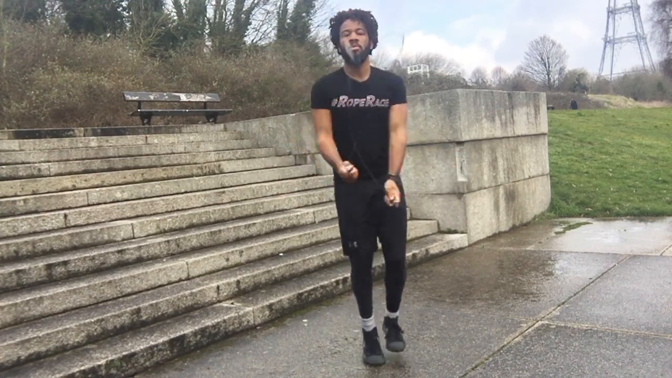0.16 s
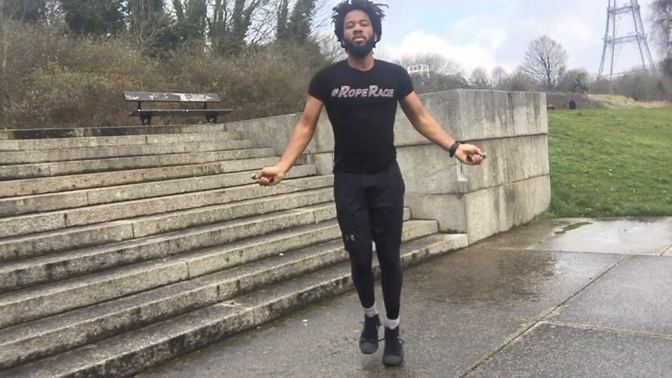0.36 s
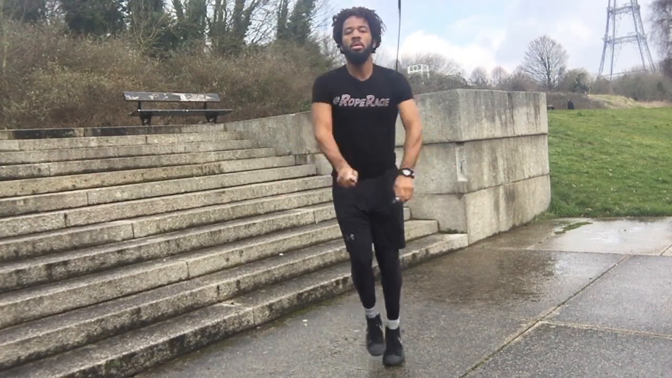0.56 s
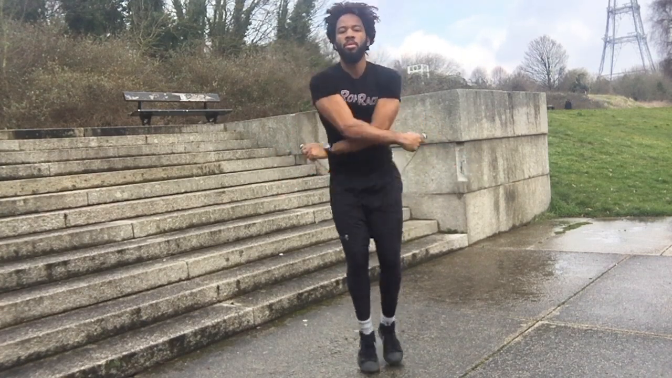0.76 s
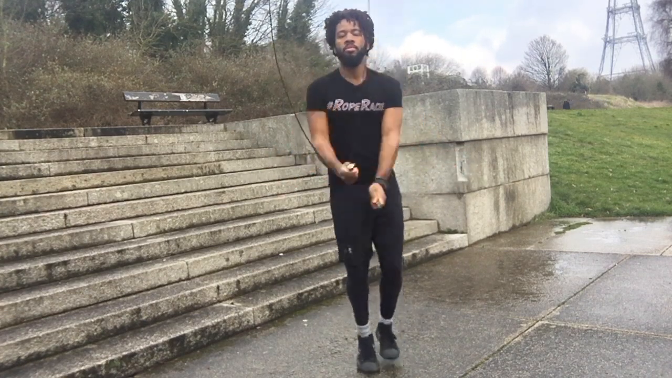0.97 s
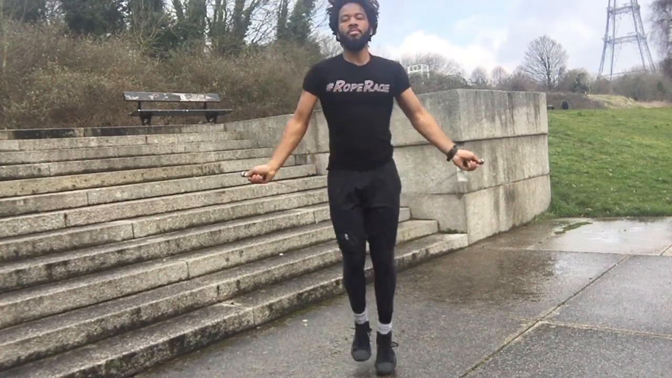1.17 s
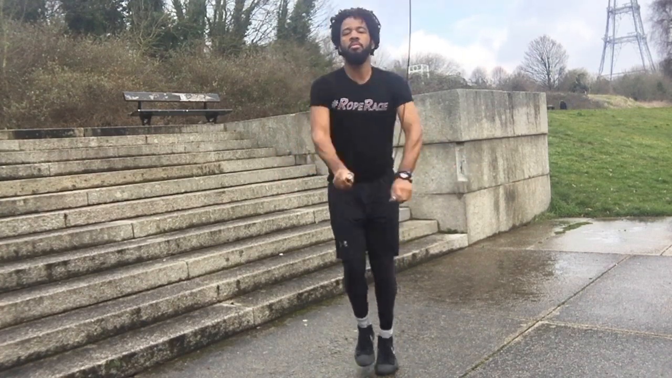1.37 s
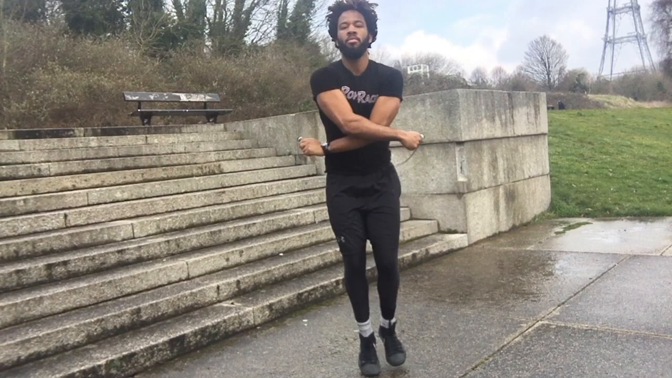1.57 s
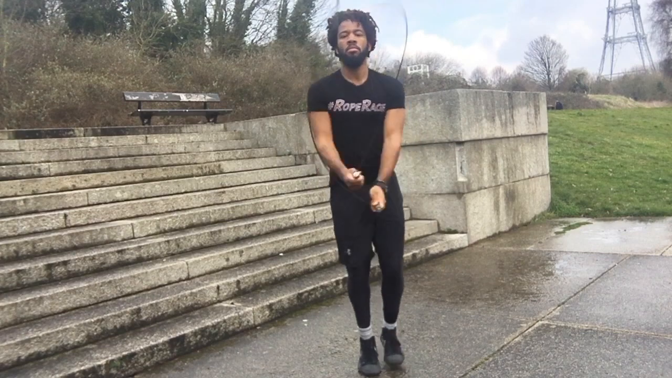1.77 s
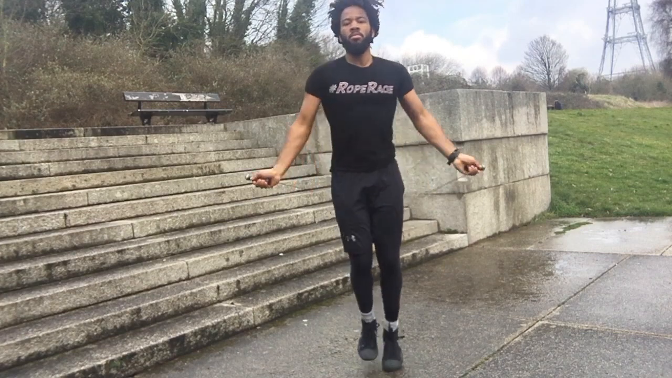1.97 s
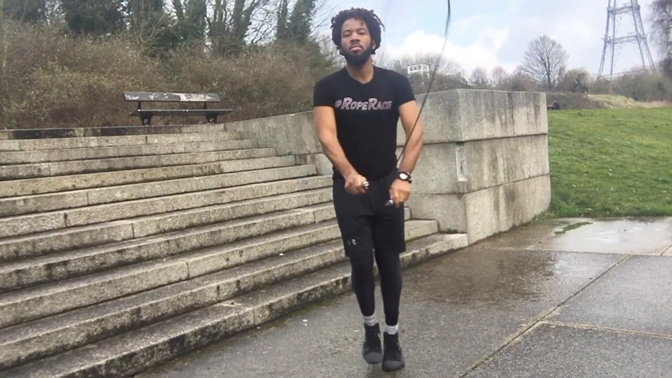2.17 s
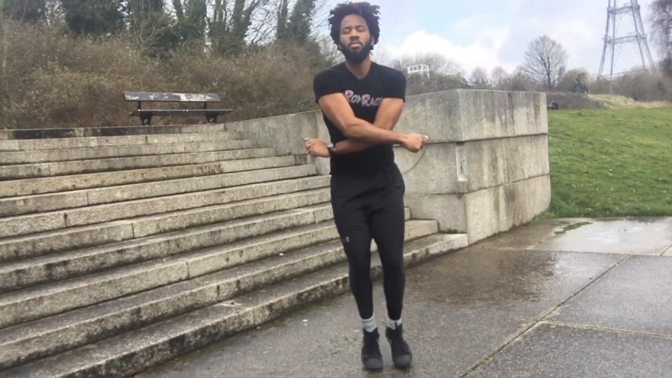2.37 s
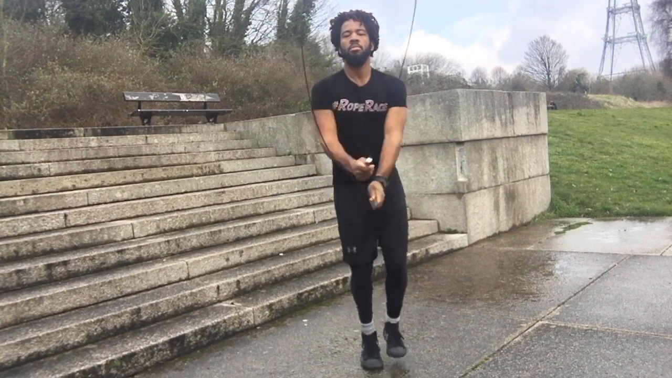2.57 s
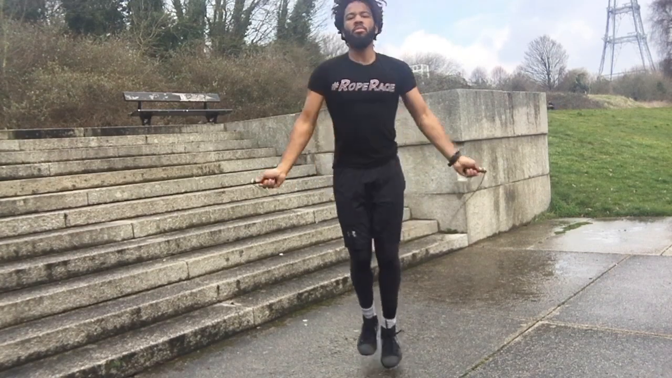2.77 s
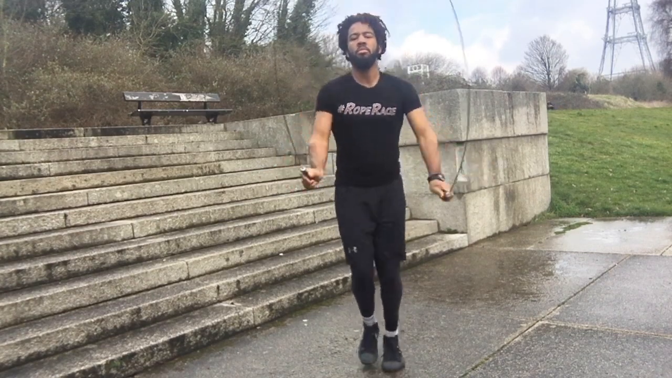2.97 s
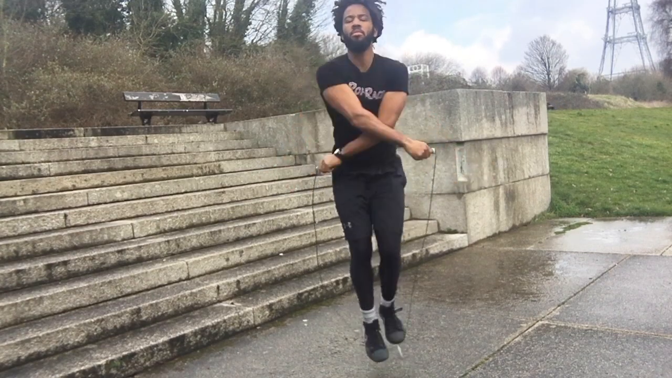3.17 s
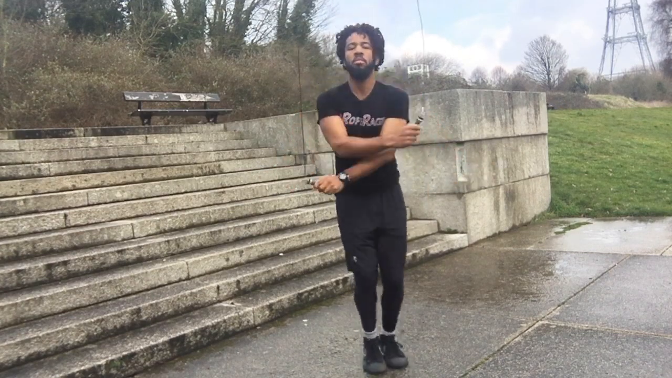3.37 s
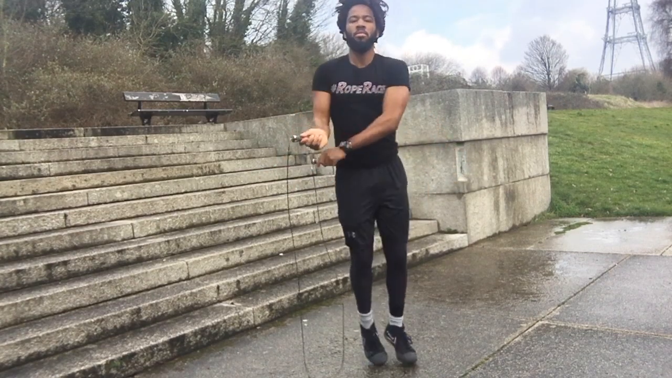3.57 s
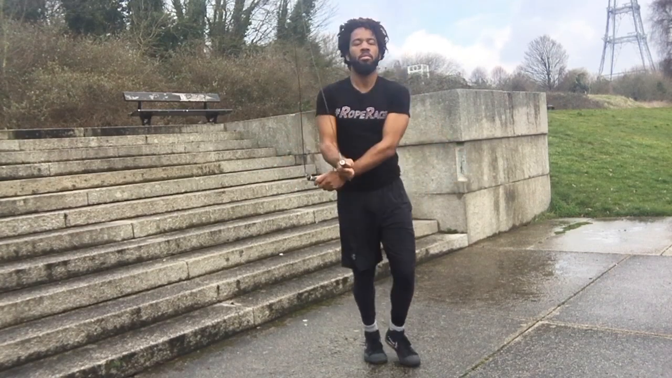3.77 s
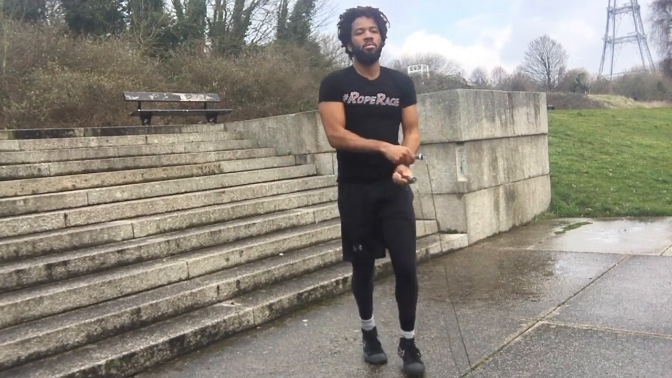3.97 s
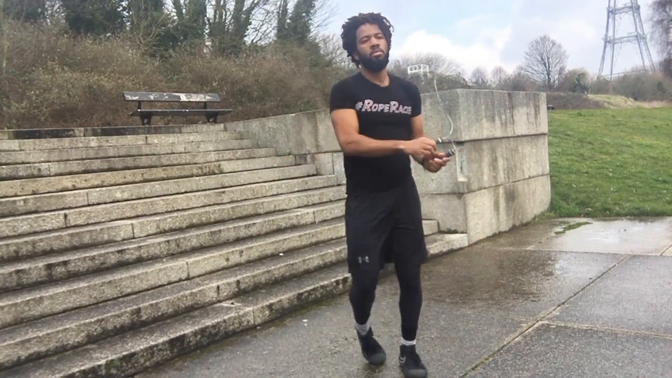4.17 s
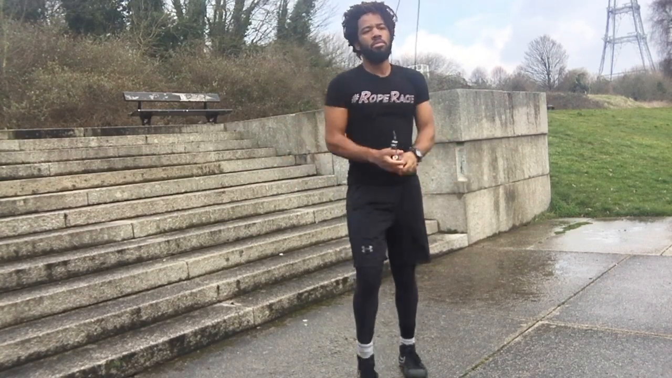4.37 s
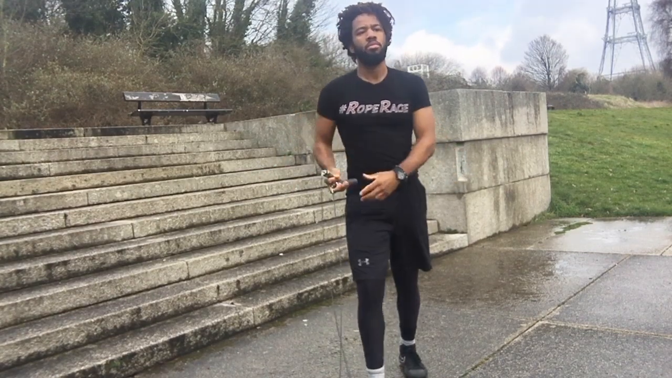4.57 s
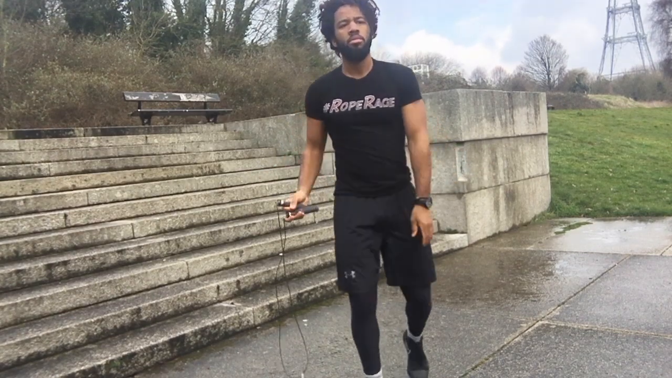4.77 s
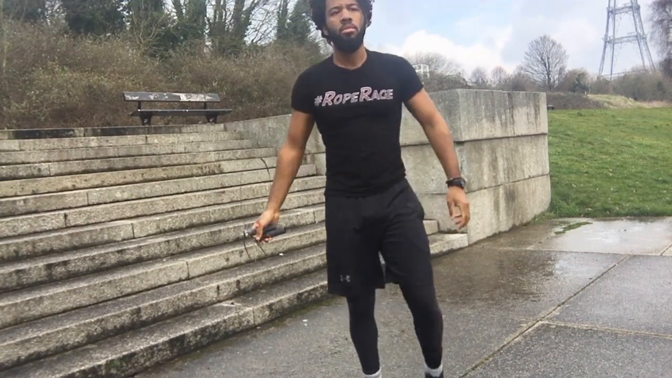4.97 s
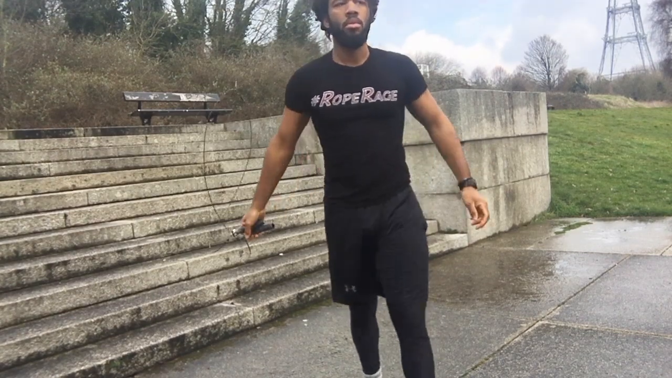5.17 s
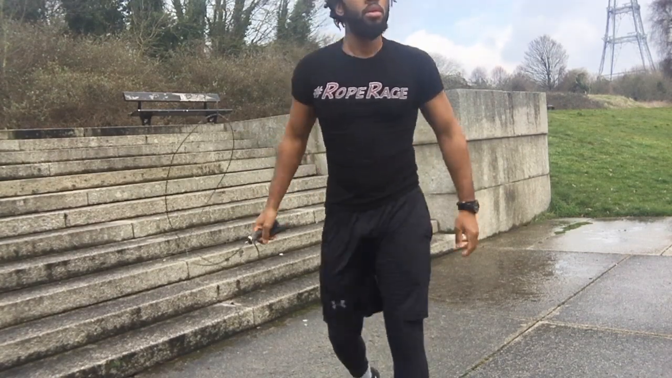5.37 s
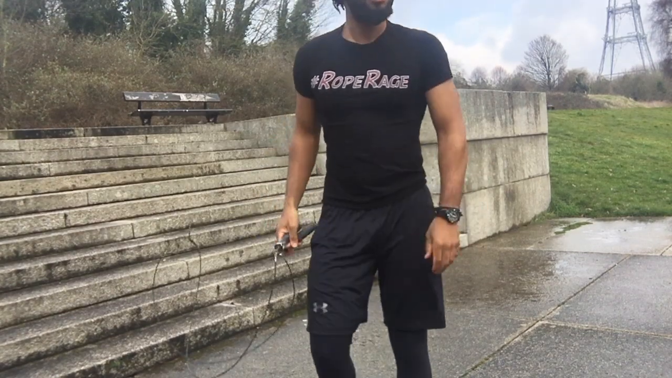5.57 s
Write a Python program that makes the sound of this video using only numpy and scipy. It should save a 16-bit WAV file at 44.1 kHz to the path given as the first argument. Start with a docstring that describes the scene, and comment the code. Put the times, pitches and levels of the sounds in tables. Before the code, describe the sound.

From the start, someone skips with a thin rope on wet paving outdoors. The cord whistles and swishes in rising and falling surges and cracks on the ground about every 0.4 seconds. Shoes land between the cracks with hollow pats, joined by tiny splashes, fine spray and crunching grit. Nearby stone steps add a slight, short echo. A bird calls faintly at about 2 seconds. After 3 seconds the slaps weaken, and near 4 seconds the skipping winds down into a few loose flicks and scrapes. The hollow plastic handles clack together at about 4.1 seconds, then more lightly at 4.6, 4.8 and 5.3. The bird calls again around 4.2 seconds, and a very faint, far hiss slides in pitch until the end at about 5.6 seconds. A low rumble of wind or distant traffic and a far engine hum continue throughout.

```python
"""Wind or far traffic rumbles as someone skips with a thin speed rope on wet paving, by stone park steps.
The cord whistles through the air on every turn, shoes land with hollow pats, and the cord cracks on the
ground, throwing up spray. About two seconds in, a bird calls faintly. Near four seconds the skipping winds
down into loose flicks and the handles knock together, while the bird calls again and a far hiss glides."""
import sys
import numpy as np
from scipy import signal
from scipy.fft import rfft, irfft, next_fast_len
from scipy.io import wavfile
from scipy.ndimage import uniform_filter1d

SR = 44100
rng = np.random.default_rng(int(sys.argv[2]) if len(sys.argv) > 2 else 0)


def file_out(sig):
    """Save sig as 16-bit WAV at sys.argv[1]."""
    # one column per channel
    cols = np.atleast_2d(sig).T
    # limit, then scale
    lim = np.clip(cols, -1, 1)
    pcm = np.round(lim * 32767).astype(np.int16)
    wavfile.write(sys.argv[1], SR, pcm)


N = 247401
TIME = np.arange(N) / SR

# The cord hits the paving. Each row: start in seconds, relative level in dB, contact time in
# milliseconds, brightness in dB, relative spray level in dB.
SLAPS = [(0.3218, -32.5, 5.05, 6, -54), (0.7243, -29.5, 0.87, 6.5, -57.5), (1.13, -30, 3.95, 1.5, -54),
         (1.5244, -27, 1.3, 2, -57), (1.9194, -27.5, 2.44, 5, -57.5), (2.3173, -30.5, 1.6, 2.5, -55),
         (2.742, -28.5, 5.4, 7.5, -54), (3.1823, -34, 2.6, 6.5, -70), (3.626, -41, 3.6, 7, -84),
         (4.0245, -42, 2.05, 17.5, -55.5), (4.671, -40, 1.86, 4, -66), (4.792, -46.5, 1.95, 1.5, -78)]
# How hard the person skips. Each row: time in seconds, level change in dB.
EFFORT = [(0, 4), (0.42, -5), (0.54, -2.5), (0.66, -0.5), (1.15, 1), (1.34, -3), (1.5, 1.5), (2.3, 1),
          (2.9, 0.5), (3.38, -2), (3.55, -1), (3.82, -5.5), (4.1, -6.5), (4.35, -10.5), (4.55, -14),
          (5.6, -22)]
# The tone of drops, swishing air and wet grit. Each row: frequency in Hz, relative strength in dB.
SPRAY_SPECTRUM = [(400, -23.5), (800, -1), (1500, -6), (3000, 3.5), (4500, -1), (6500, -6), (10000, -14),
                  (16000, -13.5)]
SWISH_SPECTRUM = [(120, -1.5), (205, 11), (280, 1), (600, 4), (1300, 0.5), (1800, 2), (2400, -3),
                  (3800, -3), (5500, -11), (8000, -17), (16000, -35.5)]
FIZZ_SPECTRUM = [(2000, -8), (4000, 0), (7000, 3), (9000, -6.5), (12000, -4.5), (16000, -11)]


def from_db(db):
    """Turn decibels into a number to multiply by."""
    return 10 ** (np.asarray(db) / 20)


def rms_one(x):
    """Scale a signal so that its average power is 1."""
    return x / np.sqrt(np.mean(x ** 2) + 1e-20)


def in_time(rows):
    """Join rows of (seconds, values...) with straight lines: one curve for each value."""
    times, *columns = np.transpose(rows)
    return [np.interp(TIME, times, column) for column in columns]


def bells(rows):
    """Add up smooth bumps. Each row: middle in seconds, half length in seconds, height."""
    t = TIME[::SR // 1000]
    middle, half_length, height = np.transpose(rows)[:, :, None]
    return np.interp(TIME, t, (height * np.exp(-((t - middle) / half_length) ** 2)).sum(axis=0))


def add(out, start, sound):
    """Mix a sound in at a start time in seconds."""
    i = int(np.clip(start * SR, 0, N - 1))
    out[i:i + len(sound)] += sound[:N - i]


def lowpass(x, hz):
    """Gently turn down everything above hz."""
    return signal.sosfilt(signal.butter(2, min(hz, SR / 2 - 1), fs=SR, output="sos"), x + 1e-18)


def band(x, hz, width):
    """Keep the sound around hz; width is a share of that frequency."""
    return signal.lfilter(*signal.iirpeak(hz, 1 / width, fs=SR), x)


def colour(x, spectrum):
    """Give a sound the tone of a spectrum table; white noise keeps its power."""
    size = next_fast_len(N + SR // 4, real=True) // 2 * 2
    hz, db = np.transpose(spectrum)
    bin_hz = np.arange(size // 2 + 1) * SR / size
    gain = rms_one(from_db(np.interp(np.log(bin_hz + 1), np.log(hz), db)))
    # make the filter ring only after a click, never before it
    cepstrum = irfft(np.log(gain))
    cepstrum[1:size // 2] *= 2
    cepstrum[size // 2 + 1:] = 0
    return irfft(rfft(x, size) * np.exp(rfft(cepstrum)))[:N]


def drift(rate_hz):
    """A smooth random wander, about 1 in size."""
    return rms_one(lowpass(rng.standard_normal(N + SR), rate_hz)[SR:])


def grains(per_s, spread_db):
    """Random clicks of uneven size."""
    sizes = from_db(spread_db * np.minimum(rng.exponential(1, N), 4)) * rng.choice([-1, 1], N)
    return rms_one(sizes * (rng.random(N) < per_s / SR))


def swings():
    """The cord's pitch and level climb with each swing and sink as it coasts; the fastest swing leads."""
    # The whistle surges about three times a jump. Each row: time of top speed in seconds, top pitch
    # in Hz, relative level in dB, length in seconds, delay of the loudest moment in seconds.
    surges = [(0.0, 1060, -47.5, 0.039, 0), (0.17, 1055, -55, .06, 0.0054), (0.28, 1270, -40, 0.024, 0.01),
              (0.449, 1120, -51, .04, 0), (0.6, 980, -52.5, 0.047, 0), (0.692, 1220, -52, 0.039, 0.01),
              (0.823, 1190, -46.5, 0.052, 0.004), (0.92, 890, -49.5, 0.032, 0.025),
              (1.004, 1060, -53, .075, 0), (1.1, 1180, -44, 0.049, 0.0085),
              (1.262, 1232, -48.5, .024, 0.0044), (1.313, 924, -47, 0.025, .014),
              (1.44, 1190, -52, .07, 0.036), (1.565, 1000, -47, 0.029, 0.0031), (1.618, 1210, -42, .036, 0),
              (1.72, 930, -54, .07, 0), (1.891, 1420, -38.5, 0.024, 0.021),
              (2.073, 1160, -44, 0.032, 0.033), (2.26, 1100, -48, .06, 0.00044),
              (2.421, 1060, -47, 0.058, 0.00042), (2.531, 800, -53.5, .03, .01),
              (2.579, 1150, -49, 0.018, 0), (2.705, 1340, -38.5, .014, 0.0088),
              (2.87, 951, -59, 0.098, 0.0024), (3.086, 1210, -46, .021, 0.0038),
              (3.195, 1031, -54, .025, 0), (3.285, 1150, -42.5, 0.029, 0.004),
              (3.448, 970, -52.5, .07, 0.05), (3.573, 1150, -47, 0.041, .015), (3.77, 937, -58.5, .06, .02),
              (4.05, 1000, -64, 0.048, 0)]
    pitch_sag, fade_db = 0.165, 7.5   # how fast pitch and level drop away from the top
    wind_up, rounding = 1.3, 0.3   # speed rises faster than it falls, over a blunt top
    slack_hz = 600   # the coasting cord sinks no lower
    top_time, top_hz, top_db, length, delay = np.transpose(surges)[:, :, None]
    t = TIME[::SR // 500]

    def away(moment):
        offset = (t - moment) / length
        return np.hypot(np.where(offset < 0, wind_up * offset, offset), rounding) - rounding

    hz = np.maximum((top_hz * np.exp(-pitch_sag * away(top_time))).max(axis=0), slack_hz)
    level_db = (top_db - fade_db * away(top_time + delay)).max(axis=0)
    hz, level_db = in_time(np.column_stack([t, hz, level_db]))
    shiver = 1 + 0.012 * drift(15.9)   # the loop shivers as it turns
    return hz * shiver, level_db


def whistle():
    """Swirls of air peel off the cord: almost a pure tone when it is slow, a rough rush when whipped."""
    hz, level_db = swings()
    speed = hz / 1000
    rotation = np.exp(2j * np.pi * np.cumsum(hz) / SR)

    def swirls(width_hz):
        return rms_one(np.real(rotation * (drift(width_hz) + 1j * drift(width_hz))))

    # the tone stands out while the cord sweeps past, which is when its pitch falls
    passing = np.tanh(-uniform_filter1d(np.gradient(hz), size=SR // 60) * SR / 2500)
    jitter = 0.5 * speed ** 2 * drift(50)
    tone = rms_one(np.real(rotation * np.exp(1j * jitter)))
    tone *= from_db(2.5 * passing + 3 * drift(50))
    rush = 0.5 * speed ** 2 * swirls(86) + 0.18 * speed ** 3 * swirls(503)
    return from_db(level_db) * (0.5 * tone + rush)


def jumps():
    """How many dB the swish and the fizz rise during the three parts of every jump."""
    # Each part: seconds after the slap, half length in seconds, swish rise in dB, fizz rise in dB.
    downstroke = (-0.46, 0.0716, 8.5, 9)
    follow_through = (0.084, 0.051, 3.6, 4.5)
    landing = (0.169, 0.034, 2.6, 6.1)
    swish, fizz = 0, 0
    for after, half_length, swish_db, fizz_db in (downstroke, follow_through, landing):
        swell = bells([(slap[0] + after, half_length, 1) for slap in SLAPS])
        swish += swish_db * swell
        fizz += fizz_db * swell
    return swish, fizz


def swish_and_fizz():
    """Cord and clothes swish through the air, and the wet paving gives a fine fizz."""
    effort_db, = in_time(EFFORT)
    swish_rise_db, fizz_rise_db = jumps()
    swish_db = -61.5 + effort_db + swish_rise_db + 1.1 * drift(25)
    fizz_db = -73.5 + effort_db + fizz_rise_db + 2.8 * drift(45)
    swish = colour(rng.standard_normal(N), SWISH_SPECTRUM)
    fizz = colour(grains(per_s=8100, spread_db=5.5), FIZZ_SPECTRUM)
    return from_db(swish_db) * swish + from_db(fizz_db) * fizz


def rumble_and_hush():
    """A low rumble of wind or far traffic, with brief buffets and dips, under a steady hush."""
    # The tone of each. Each row: frequency in Hz, relative strength in dB.
    rumble_spectrum = [(20, -31), (32, -19.5), (42, -10), (54, 6), (75, 0.5), (100, -4.5), (120, -10.5),
                       (150, -15.5), (220, -19.5), (400, -37.5), (16000, -130)]
    hush_spectrum = [(100, -2.5), (180, -0.5), (300, -7.5), (600, -13.5), (1000, -12.5), (1600, -18.5),
                     (3000, -26.5), (4500, -29), (7500, -39.5), (10000, -45.5), (16000, -50)]
    # Brief rises and dips. Each row: middle in seconds, half length in seconds, change in dB.
    buffets = [(0.53, 0.018, 5), (1.04, 0.062, 2.5), (1.6, 0.089, -2), (2.52, .03, 6.5), (2.62, .03, 0.5),
               (2.78, 0.061, 5), (3.04, 0.039, 8), (3.13, 0.036, -10), (3.5, .045, -8), (4.2, .08, 8),
               (4.46, 0.047, 9.5), (4.61, 0.068, -8), (5.12, 0.12, 5), (5.33, 0.037, 4.5), (5.53, 0.077, 4)]
    rumble_db = -53 + bells(buffets) + 0.7 * drift(7.6)
    rumble = colour(rng.standard_normal(N), rumble_spectrum)
    rumble /= np.sqrt(uniform_filter1d(rumble ** 2, size=SR // 12))   # even out the noise first
    hush = colour(rng.standard_normal(N), hush_spectrum)
    return from_db(rumble_db) * rumble + from_db(-57.5) * hush


def engine():
    """One far engine drones, wavering with distance."""
    # Its hum. Each row: time in seconds, pitch in Hz, level in dB.
    hum = [(0, 110, -58.5), (.4, 112, -53.5), (.8, 117, -51), (1.5, 121, -55.5), (2.3, 120, -60),
           (2.9, 116, -58), (3.6, 113, -58.5), (5.61, 103, -60)]
    hz, level_db = in_time(hum)
    gain = from_db(level_db + 2.0 * drift(9.2))
    return gain * np.sin(2 * np.pi * np.cumsum(hz) / SR + 0.47 * drift(5.3))


def shoes():
    """Air squeezed from under a sole gives a pat that falls in pitch; harder landings smack brighter."""
    # Each row: start of a landing in seconds, relative level in dB, pitch in Hz that the pat falls past.
    landings = [(0.023, -34, 398), (0.408, -39.5, 520), (0.481, -42, 630), (0.822, -39.5, 754),
                (0.85, -36.5, 547), (1.244, -36.5, 375), (1.291, -37.5, 503), (1.627, -40.5, 460),
                (1.659, -38, 415), (2.034, -36, 535), (2.084, -40, 587), (2.361, -30, 554),
                (2.429, -38.5, 565), (2.445, -40.5, 305), (2.856, -36, 546), (2.903, -36, 487),
                (3.281, -38, 318), (3.321, -34, 541.6), (3.672, -41, 358)]
    # The tone of a sole on stone. Each row: frequency in Hz, relative strength in dB.
    scuff_spectrum = [(100, -29.5), (250, 5), (370, 4), (600, -5), (1000, -14.5), (1500, -25), (4000, -32),
                      (16000, -36)]
    out, scuff, t = np.zeros(N), np.zeros(N), np.arange(SR // 12) / SR
    for start, level_db, pat_hz in landings:
        hz = pat_hz * (0.677 + 1.33 * np.exp(-t / 0.0013))
        pat = np.sin(2 * np.pi * np.cumsum(hz) / SR) * (1 - np.exp(-t / 0.0005)) * np.exp(-t / 0.002)
        smack = lowpass(rng.standard_normal(len(t)) * np.exp(-t / 0.0015), 2600)
        gain = from_db(level_db + 8.0)
        add(out, start + 0.001465, gain * (pat + from_db(level_db + 28.0) * smack))
        add(out, start + rng.uniform(0.00548, 0.00979), gain * 0.37 * pat)   # the rest of the sole lands
        add(scuff, start + 0.00206, gain * rng.standard_normal(len(t)) * np.exp(-t / 0.0076))
    return out + from_db(-16) * colour(scuff, scuff_spectrum)


def scrapes():
    """Wet grit crunches under soles and cord in a dense run of tiny clicks."""
    # Each row: middle of a scrape in seconds, half length in seconds, relative level in dB.
    drags = [(0.084, 0.031, -64.5), (0.43, 0.0074, -73), (0.495, 0.007, -65), (0.662, .012, -60.5),
             (0.898, 0.017, -60.5), (1.047, 0.018, -60.5), (1.688, 0.02, -59), (1.992, 0.017, -60.5),
             (2.45, 0.022, -58), (3.095, .012, -59), (3.34, 0.017, -60), (3.469, 0.017, -61.5),
             (3.75, 0.0084, -61.5), (3.947, 0.0082, -63), (4.043, 0.0055, -55), (4.088, 0.044, -59),
             (4.351, .008, -69), (4.449, 0.017, -67), (4.697, 0.0094, -61), (5.317, .014, -63)]
    pressure = bells([(middle, half_length, from_db(db)) for middle, half_length, db in drags])
    grit = colour(grains(per_s=3900, spread_db=3.5), FIZZ_SPECTRUM)
    crunch = grit + 5.4 * band(grains(per_s=2300, spread_db=2.0), 3340, width=0.45)
    rub = colour(rng.standard_normal(N), SWISH_SPECTRUM)
    return pressure * (from_db(-1.5) * crunch + from_db(-1) * rub)


def slaps():
    """The cord lays itself along the stone: a few hard touches in a row, and the film of water bursts."""
    # The tone of the crack. Each row: frequency in Hz, relative strength in dB.
    crack_spectrum = [(150, -16), (500, -9.5), (800, -6.5), (1150, -3.5), (2000, -1), (2850, -2.5),
                      (3400, -2), (4000, -0.5), (5000, -3.5), (7000, -3.5), (10000, -7.5), (13000, -8),
                      (16000, -15)]
    out, t = np.zeros(N), np.arange(SR // 25) / SR
    for start, level_db, contact_ms, bright_db, _ in SLAPS:
        contact_s = contact_ms / 1000
        touches = np.zeros(len(t))
        touches[0] = 1
        later_s = (np.arange(3) + rng.uniform(0.2, 1, size=3)) / 3 * contact_s
        touches[(later_s * SR).astype(int)] += rng.choice([-1, 1], size=3) * rng.uniform(0.79, 1, size=3)
        film = rng.standard_normal(len(t)) * np.exp(-t / (0.0048 + 0.7 * contact_s))
        hit = touches + 0.69 * film * np.linalg.norm(touches) / np.linalg.norm(film)
        treble = signal.sosfilt(signal.butter(2, 4200, "high", fs=SR, output="sos"), hit)
        hit = lowpass(hit, 3000) - from_db(bright_db - 3.0) * treble
        add(out, start, from_db(level_db + 22.5) * hit / np.linalg.norm(lowpass(hit, 10700)))
    return colour(out, crack_spectrum)


def spray():
    """Each slap flings up a fine mist and a few fat drops that click back one by one."""
    amount, t = np.zeros(N), np.arange(SR // 3) / SR
    for start, *_, spray_db in SLAPS:
        add(amount, start, from_db(spray_db + 12.0) * (1 - np.exp(-t / 0.0036)) * np.exp(-t / 0.032))
    mist = grains(per_s=4000, spread_db=1.0)
    drops = grains(per_s=220, spread_db=2.5)
    return colour(amount * (mist + 1.77 * drops) / 2, SPRAY_SPECTRUM)


def splashes():
    """Tiny splashes, each a soft click and a brief crackle; fainter drips fall at random."""
    # The loudest wet ticks of soles and cord. Each row: start in seconds, relative level in dB.
    ticks = [(0.3461, -31), (0.378, -38), (0.427, -37.5), (0.4933, -37), (1.278, -35.5), (1.4635, -39.5),
             (1.8326, -41), (1.8657, -40), (1.9734, -39), (2.0683, -43.5), (2.36, -37), (2.4336, -35),
             (2.4942, -40), (2.754, -39), (2.7635, -37), (2.8, -34), (3.0849, -38.5), (3.4449, -39),
             (4.1644, -43.5)]
    drips_per_s = 11
    out, t = np.zeros(N), np.arange(SR // 30) / SR
    crackle = grains(per_s=3500, spread_db=2.0)
    effort_db, = in_time(EFFORT)
    drip_db = -47.5 + effort_db + 1.5 * rng.standard_normal(N)
    falls = rng.random(N) < drips_per_s / SR
    for k, (start, level_db) in enumerate([*ticks, *zip(TIME[falls], drip_db[falls])]):
        piece = crackle.take(k * len(t) + np.arange(len(t)), mode="wrap")
        splash = 0.42 * piece * np.exp(-t / 0.006)
        splash[0] = 3.0   # the click
        add(out, start + 0.001054, splash * from_db(level_db - 1.5))
    return lowpass(colour(out, SPRAY_SPECTRUM), 10600)


def whooshes():
    """Short, broad whooshes with no clear pitch come during the skipping."""
    # Each row: middle of a whoosh in seconds, half length in seconds, level in dB, centre in Hz.
    rushes = [(0.357, 0.017, -54, 1900), (1.094, 0.015, -45, 1610), (1.448, 0.023, -55, 1510),
              (1.567, 0.023, -51, 1752), (2.003, 0.019, -50, 1612), (2.271, .03, -51, 1540),
              (2.963, .025, -54, 1680), (3.84, 0.025, -62.5, 1614)]
    out = np.zeros(N)
    for middle, half_length, level_db, hz in rushes:
        swell = np.exp(-np.linspace(-2, 2, int(4 * half_length * SR)) ** 2)
        rush = band(band(rng.standard_normal(len(swell)), hz, width=0.41), hz, width=0.83)
        add(out, middle - 2 * half_length, from_db(level_db) * swell * rms_one(rush))
    return out


def bird():
    """A bird's thin whistles glide and settle, blurred by distance."""
    # Each row: start and length of a call in seconds, first and last pitch in Hz, level in dB.
    calls = [(1.985, 0.082, 4020, 4010, -59), (4.189, 0.09, 4050, 3700, -65.5),
             (4.241, 0.12, 3300, 2910, -57.5), (4.432, 0.28, 7500, 7800, -78),
             (5.423, 0.17, 7560, 7200, -78)]
    out = np.zeros(N)
    for start, length, start_hz, end_hz, level_db in calls:
        progress = np.linspace(0, 1, int(length * SR))
        waver, flutter = drift(130)[:len(progress)], drift(60)[:len(progress)]
        hz = end_hz + (start_hz - end_hz) * (1 - progress) ** 4 + 45 * waver
        gain = from_db(level_db + 2.93 * flutter) * np.sin(np.pi * progress)
        add(out, start, gain * np.sin(2 * np.pi * np.cumsum(hz) / SR))
    return out


def handles():
    """Gathered in one hand, the hollow plastic handles clack, chatter and ring very briefly."""
    # Each row: start of a knock in seconds, relative level in dB, ring in Hz, treble cut-off in Hz.
    knocks = [(4.092, -23, 3520, 5370), (4.577, -33, 2520, 4000), (4.816, -29, 5700, 13100),
              (5.295, -29, 5530, 6100)]
    out, t = np.zeros(N), np.arange(SR // 15) / SR
    for start, level_db, ring_hz, cut_hz in knocks:
        chatter = rng.standard_normal(len(t)) * (np.exp(-t / 0.0042) + 0.27 * np.exp(-t / 0.023))
        chatter[0] = 4   # the first clack
        shell = band(lowpass(chatter, cut_hz), 3780, width=1.3)
        knock = shell + 2.0 * band(chatter, ring_hz, width=0.082)
        add(out, start, from_db(level_db + 8.0) * knock / np.linalg.norm(knock))
    return out


def far_hiss():
    """Narrow bands of far hiss swell, slide in pitch and fade."""
    # Each row: start and length in seconds, first and last pitch in Hz, half width in Hz, level in dB.
    glides = [(4.1, 1.28, 1850, 1350, 90.3, -70), (4.65, 0.91, 3645, 4300, 260, -72),
              (4.805, 0.7, 4350, 5570, 260, -74.5)]
    out = np.zeros(N)
    for start, length, start_hz, end_hz, width_hz, level_db in glides:
        progress = np.clip((TIME - start) / length, 0, 1)
        tone = np.sin(2 * np.pi * np.cumsum(start_hz + (end_hz - start_hz) * progress) / SR)
        out += from_db(level_db) * np.sin(np.pi * progress) * rms_one(tone * drift(width_hz))
    return out


def stonework(x):
    """Sound bounces off the stone steps and the wall, adding a few dull echoes and a short scatter."""
    # Each row: delay of an echo in seconds, level in dB.
    echoes = [(.0075, -28), (0.012, -23.5), (.022, -30), (0.029, -21.5), (.037, -53)]
    out, dull, t = x.copy(), lowpass(x, 12000), np.arange(SR // 3) / SR
    for delay, echo_db in echoes:
        add(out, delay, from_db(echo_db) * dull)
    scatter = rng.standard_normal(len(t)) * (1 - np.exp(-t / 0.0058)) * np.exp(-t / 0.044)
    scatter /= np.linalg.norm(scatter)
    return out + from_db(-20.5) * signal.fftconvolve(lowpass(x, 3300), scatter)[:N]


def scene():
    """Mix the skipper by the stonework with the park around, in one channel."""
    echoing = stonework(slaps() + shoes() + splashes() + handles() + whistle() + whooshes())
    skipper = echoing + spray() + swish_and_fizz() + scrapes()
    return (skipper + rumble_and_hush() + engine() + bird() + far_hiss())[None]


def record(dry):
    """Cut off the very highest treble steeply."""
    cutoff_hz = 16400
    return signal.sosfilt(signal.ellip(10, 0.2, 80, cutoff_hz, fs=SR, output="sos"), dry)


dry = scene()
out = record(dry)
file_out(out)
```